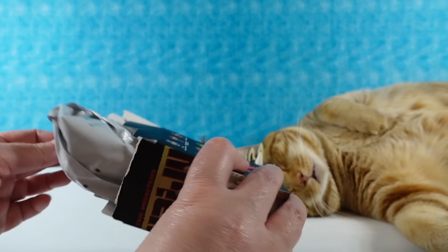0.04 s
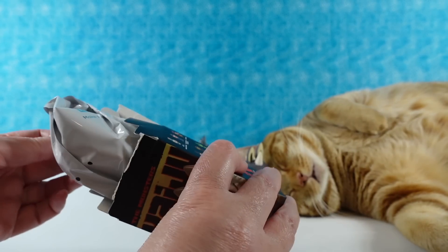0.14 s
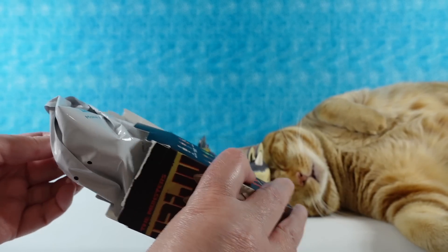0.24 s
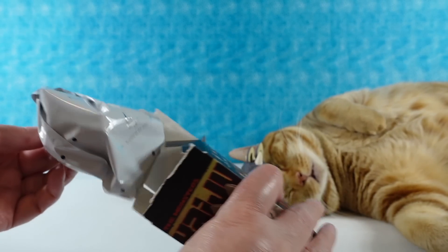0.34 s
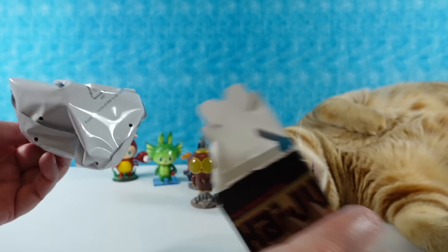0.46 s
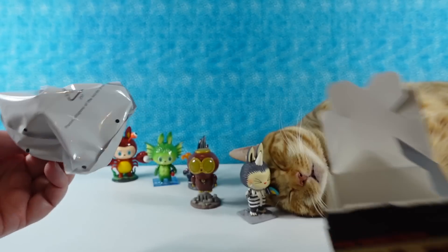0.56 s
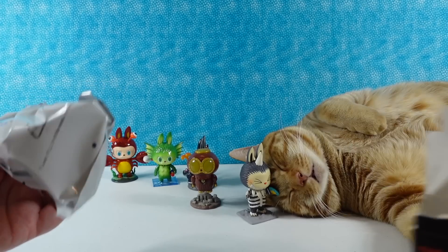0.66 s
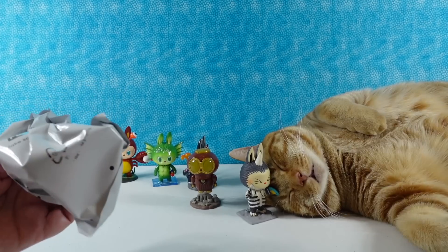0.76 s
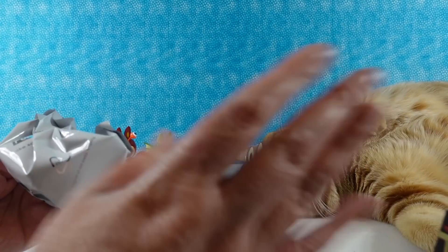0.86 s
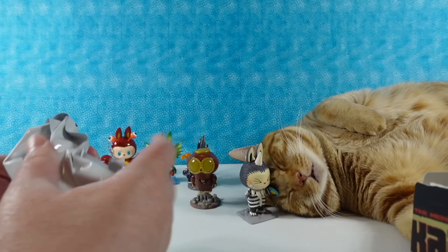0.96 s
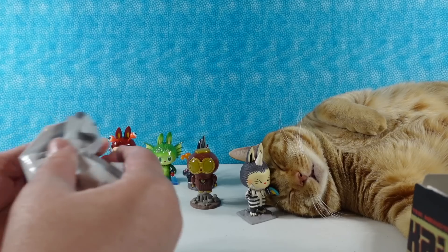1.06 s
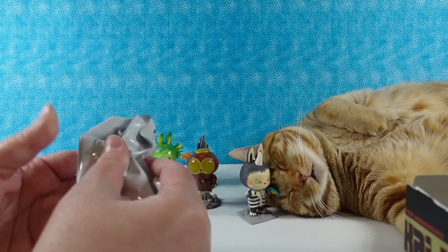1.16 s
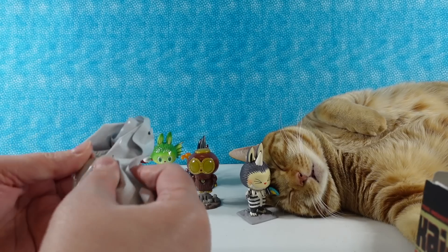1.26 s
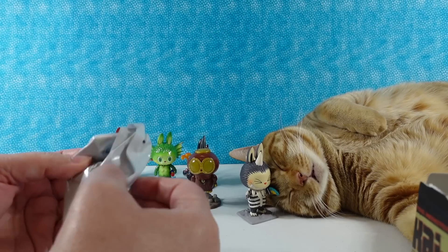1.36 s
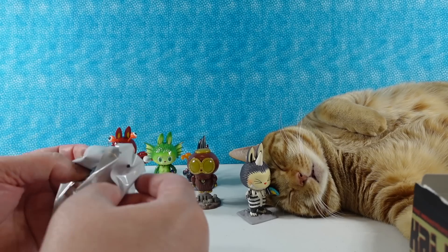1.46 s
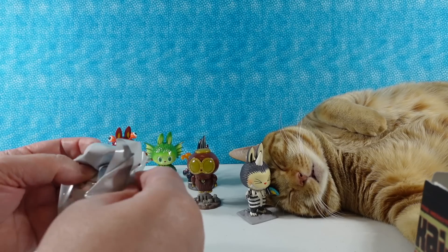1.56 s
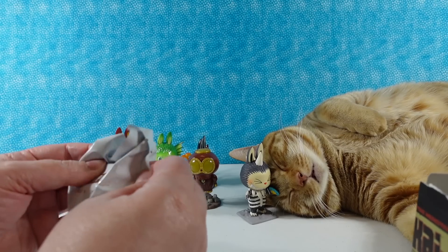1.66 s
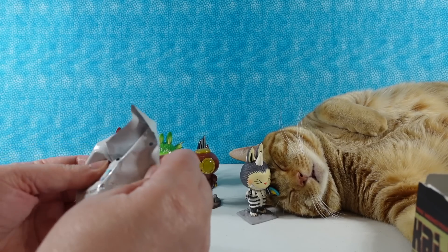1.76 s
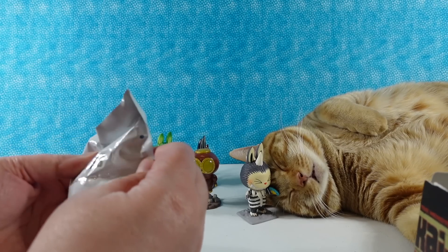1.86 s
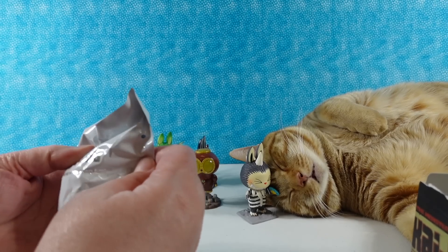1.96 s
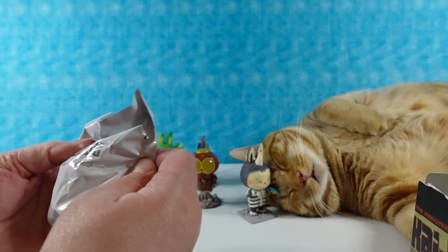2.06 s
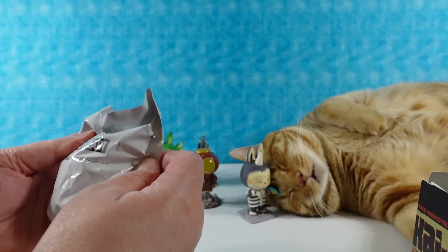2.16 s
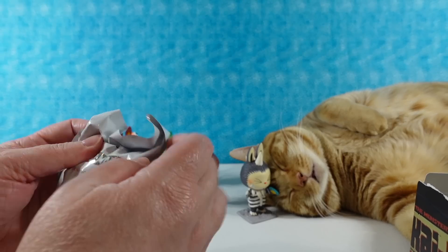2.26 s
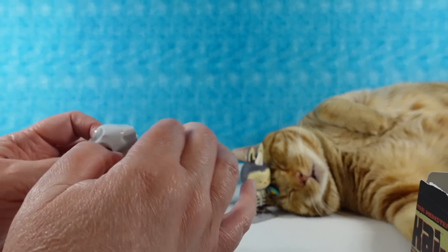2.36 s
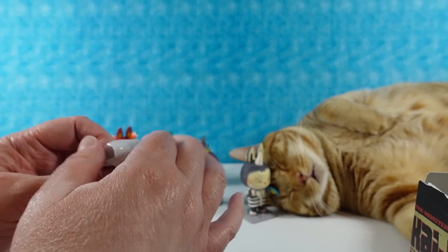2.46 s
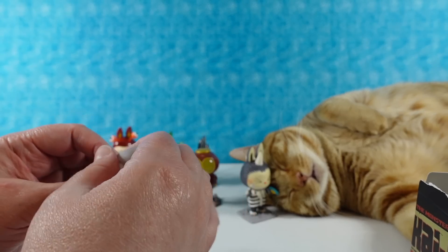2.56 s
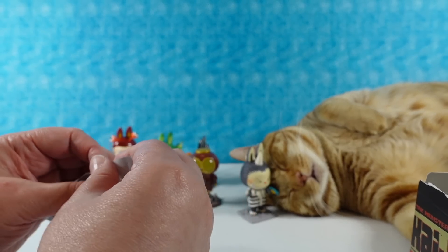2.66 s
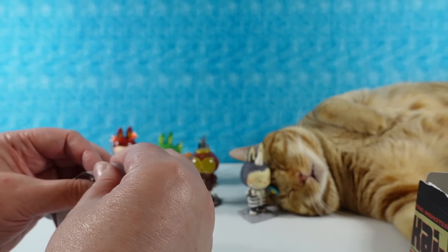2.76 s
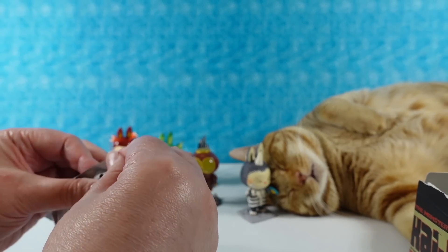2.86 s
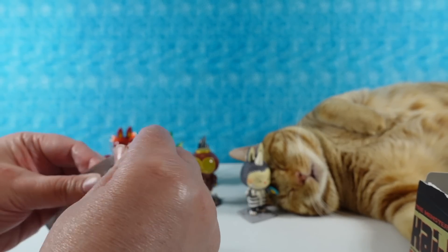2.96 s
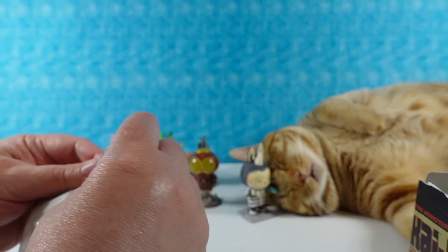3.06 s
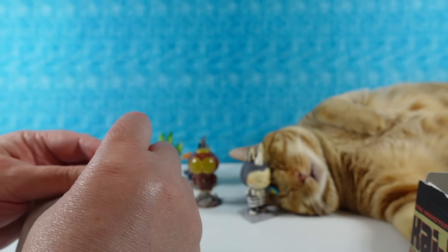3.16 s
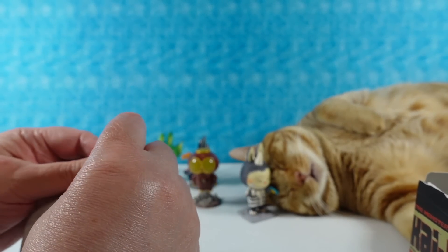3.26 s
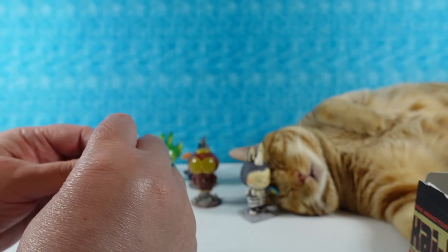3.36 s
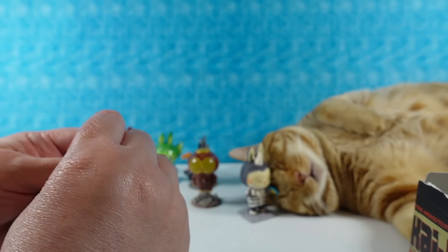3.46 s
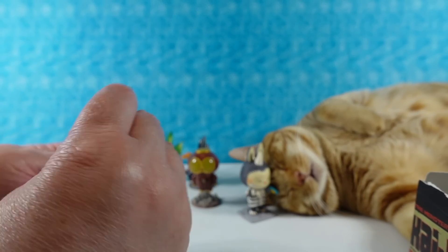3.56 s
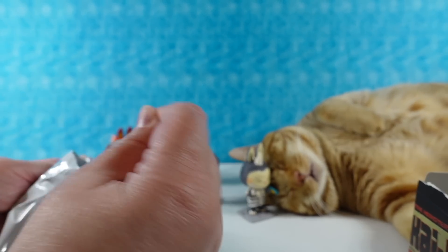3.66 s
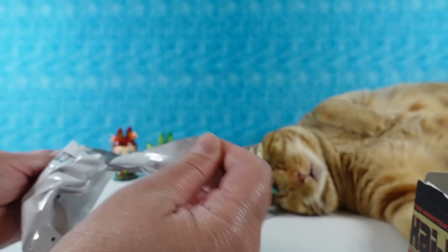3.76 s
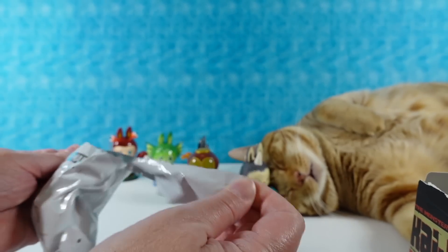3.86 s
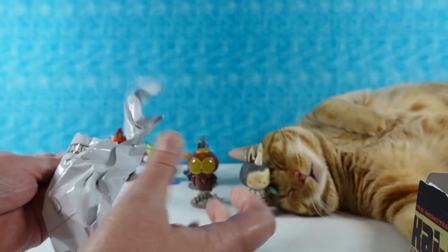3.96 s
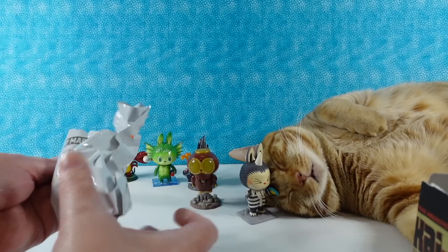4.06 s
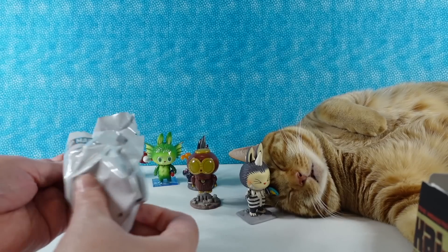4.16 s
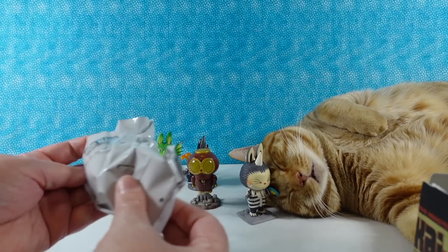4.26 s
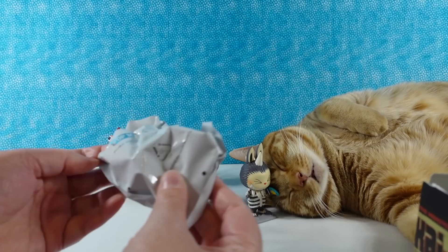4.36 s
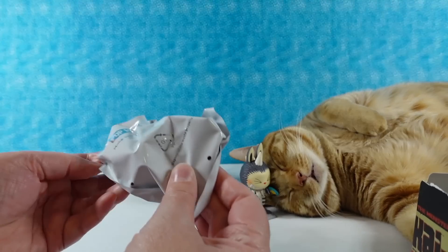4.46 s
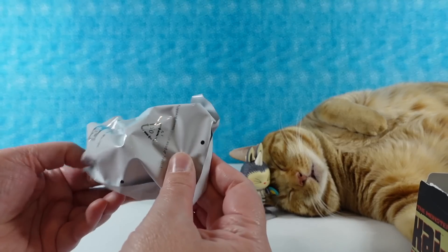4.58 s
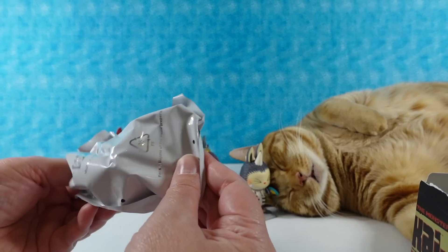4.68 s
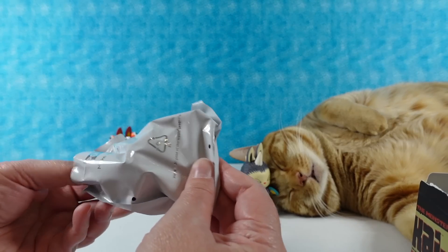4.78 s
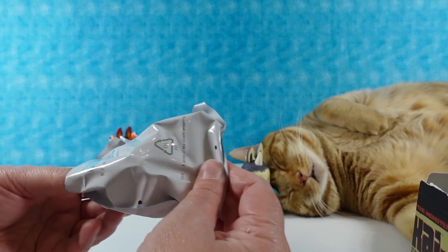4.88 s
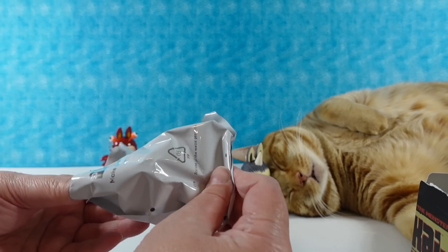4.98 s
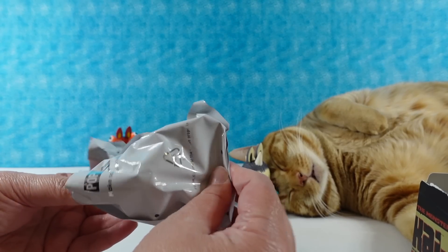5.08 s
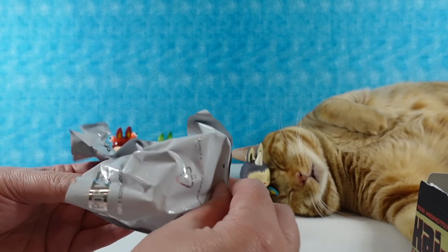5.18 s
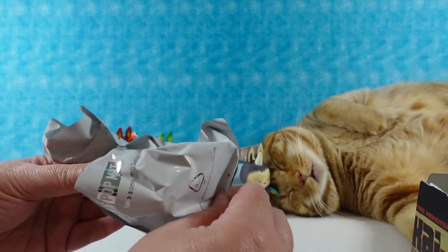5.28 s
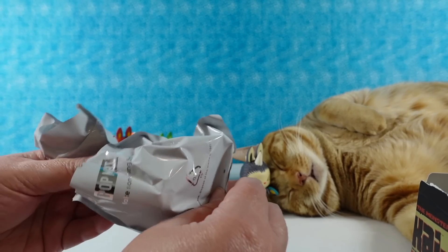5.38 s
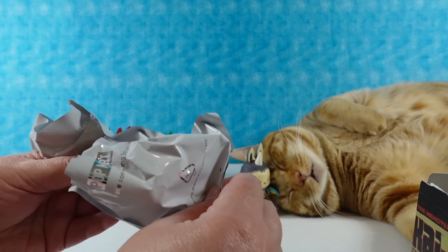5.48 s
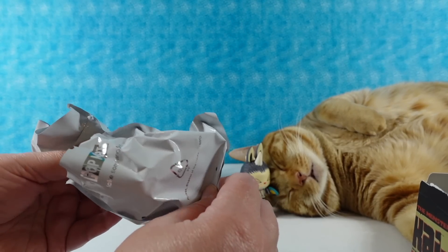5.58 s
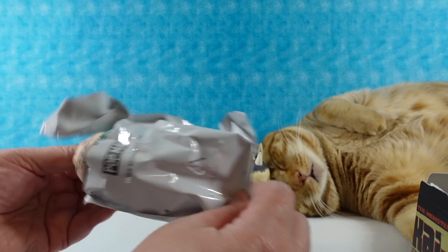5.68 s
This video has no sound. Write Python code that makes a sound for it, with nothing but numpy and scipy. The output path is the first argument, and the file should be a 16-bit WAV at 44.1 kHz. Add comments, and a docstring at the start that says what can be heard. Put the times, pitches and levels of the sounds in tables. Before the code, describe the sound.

Foil bag slides from a cardboard box with muffled crinkling, the box knocks the table, then dense, sharp, close foil crackling continues.

```python
"""Close at the microphone, hands slide a foil bag out of a cardboard box; its crinkling is coloured by the box's cavity.
From 0.52 s the bag is in free air; from 0.67 s the box knocks on the table, ringing it with a slap and a thud.
The bag is crumpled open, and from 3.92 s its gaping mouth colours the crinkling; four times a side flips with a deep pop.
Throughout, each large crease rings a facet of film and pops the hollow bag, over fine crackle and rubbing noise.
A small dry room answers with decaying noise, over faint still air."""
import sys
import numpy as np
from scipy import signal
from scipy.fft import rfft, irfft, next_fast_len
from scipy.io import wavfile
from scipy.ndimage import uniform_filter1d

SR = 44100
rng = np.random.default_rng(int(sys.argv[2]) if len(sys.argv) > 2 else 0)


def store_wav(level_fs):
    """Save 16-bit WAV to argv[1]."""
    pcm = np.round(np.clip(np.atleast_2d(level_fs), -1, 1) * 32767)
    wavfile.write(sys.argv[1], SR, pcm.T.astype(np.int16))


N = 252648  # samples in the whole take

# All level_db columns are relative: each source sets its own gain on top.
# each squeeze, push or pull of the fingers: start_s [s], hold_s [s], crackle_db [dB], bag_flex_db [dB]
SQUEEZES = [(0.0, 0.079, -25.5, -30.5), (0.18, 0.076, -44.5, -49.5), (0.27, 0.068, -33.5, -42),
            (0.456, 0.0039, -37, -45), (0.634, 0.013, -34.5, -48.5), (0.709, 0.17, -39.5, -51),
            (0.921, 0.089, -41, -42), (1.029, 0.151, -29.5, -38.5), (1.264, 0.071, -27, -46),
            (1.403, 0.15, -22.5, -37.5), (1.652, 0.11, -23.5, -31.5), (1.814, 0.1, -27, -31.5),
            (1.989, 0.089, -26.5, -40.5), (2.236, 0.1, -20, -32), (2.417, 0.1, -32.5, -61),
            (2.548, 0.053, -29.5, -53), (2.708, 0.22, -28.5, -42), (2.972, 0.02, -28.5, -38.5),
            (3.041, 0.13, -23, -32), (3.27, 0.075, -46.5, -45.5), (3.389, 0.062, -32.5, -43.5),
            (3.462, 0.028, -29.5, -31.5), (3.568, 0.14, -18.5, -26), (3.72, 0.086, -27.5, -38.5),
            (3.922, 0.031, -26.5, -36.5), (4.055, 0.018, -31.5, -62), (4.193, 0.069, -28.5, -42.5),
            (4.325, 0.068, -31, -41), (4.448, 0.028, -34, -38.5), (4.516, 0.044, -33.5, -35.5),
            (4.625, 0.05, -25, -37), (4.772, 0.17, -33, -35), (5.005, 0.13, -30.5, -39.5),
            (5.202, 0.086, -23.5, -44), (5.275, 0.16, -25.5, -29.5), (5.502, 0.027, -33, -40.5),
            (5.635, 0.019, -33, -38.5), (5.703, 0.055, -18.5, -41)]
# large creases that buckle: start_s [s], snap_db [dB], facet_ring_hz [Hz], bag_pop_db [dB]
CREASES = [(0.0368, -16, 3317, -23), (0.0856, -10, 2447, -24.5), (0.1166, -11, 7290, -34),
           (0.3186, -13.5, 3760, -26), (0.3511, -16, 3206, -19.5), (0.3552, -9, 3770, -15.5),
           (0.4156, -26, 2882, -24.5), (0.4575, -18, 4050, -42), (0.5839, -17.5, 4304, -43),
           (0.706, -15.5, 3217, -34), (0.8188, -40, 3060, -24), (1.0359, -11.5, 5050, -23.5),
           (1.0924, -7, 6953, -27), (1.1682, -10, 5117, -46), (1.1816, -11, 7210, -30),
           (1.2525, -7, 5666, -24), (1.2771, -18, 4400, -16.5), (1.3104, -6.5, 3395, -12),
           (1.3366, -9, 3856, -38), (1.3841, -8.5, 5456, -31), (1.3965, -13, 4246, -26),
           (1.422, -6, 5010, -12), (1.4415, -11, 4970, -14), (1.477, -5.5, 3846, -17),
           (1.5173, -8.5, 5107, -17), (1.564, -12.5, 4270, -30), (1.5738, -13, 5315, -25),
           (1.604, -19, 3410, -21.5), (1.6385, -7.5, 4530, -44), (1.6622, -6, 4565, -38),
           (1.699, -10.0, 5510, -32), (1.7636, -10.5, 6240, -19), (1.8075, -17, 3790, -10.5),
           (1.8177, -12, 3180, -9), (1.8259, -14, 3887, -8.5), (1.8595, -7, 5287, -17),
           (1.8772, -13.5, 3668, -13), (1.8998, -8.5, 4064, -21), (1.9623, -7, 5060, -17),
           (1.9964, -10, 3700, -21), (2.049, -7, 3395, -20), (2.1088, -9, 5107, -45),
           (2.115, -12.5, 6596, -49), (2.1262, -13, 4940, -39), (2.134, -8, 4190, -42),
           (2.1502, -10.5, 5075, -29), (2.1936, -7, 4316, -29), (2.2404, -9, 4200, -17),
           (2.2624, -10, 5160, -16), (2.2706, -8, 5230, -10.5), (2.2884, -7, 5155, -36),
           (2.2967, -6, 4837, -22), (2.4361, -13.5, 3632, -30.5), (2.58, -27, 5000, -21.5),
           (2.594, -16.5, 6940, -37), (2.6634, -10.5, 5580, -29), (2.7287, -10.5, 6050, -34),
           (2.751, -9, 6840, -32), (2.8075, -11, 5990, -22.5), (2.855, -7, 6570, -22),
           (2.9116, -10.5, 7376, -38), (2.9414, -10, 3220, -18), (3.0044, -12, 7363, -40),
           (3.039, -10, 4615, -35), (3.09, -27, 4717, -21), (3.1016, -14, 7304, -33),
           (3.1523, -11, 5986, -15.5), (3.277, -21, 6404, -42), (3.3053, -14.5, 6093, -29.5),
           (3.4445, -10, 6530, -26), (3.4841, -6, 3556, -18), (3.4972, -12, 4980, -14.5),
           (3.5489, -7.5, 5790, -33), (3.5702, -7.5, 7100, -16), (3.6115, -5.5, 5500, -24),
           (3.629, -13, 5470, -19), (3.6856, -13, 5050, -13), (3.7425, -11, 6580, -53),
           (3.7601, -7, 7090, -18), (3.8408, -9, 5700, -17), (3.9003, -10.5, 4390, -33),
           (3.9291, -13, 5045, -34), (3.9381, -6.5, 4390, -35), (3.9741, -9.5, 4780, -23.5),
           (4.0505, -8.5, 4195, -26.5), (4.0658, -11.5, 4820, -35), (4.1786, -21, 2794, -29),
           (4.1958, -10, 5700, -29), (4.2262, -9.5, 5160, -40), (4.289, -13, 3550, -26.5),
           (4.3234, -8.5, 5745, -21.5), (4.3369, -10.5, 3640, -28), (4.3766, -10.5, 3955, -23.5),
           (4.4203, -16.5, 2287, -21), (4.5217, -17.5, 3720, -25), (4.573, -11.5, 4460, -44),
           (4.6259, -15.5, 3290, -21), (4.6664, -6, 4990, -16), (4.746, -8.5, 4786, -26),
           (4.8135, -9.5, 3650, -42), (4.842, -15.5, 2500, -18), (4.8605, -9.5, 4475, -13.5),
           (4.898, -7, 7845, -54), (5.0155, -11, 2316, -11), (5.0777, -9, 5870, -23),
           (5.0963, -7, 4530, -27), (5.125, -14.5, 3113, -30), (5.1916, -10.5, 6294, -30),
           (5.2017, -7.5, 3920, -43), (5.268, -9, 5900, -29), (5.2902, -10, 3317, -14.5),
           (5.325, -8.5, 4165, -17), (5.39, -11.5, 2270, -20), (5.4273, -8, 4154, -17),
           (5.6798, -8, 2934, -31), (5.6991, -9, 4220, -17.5), (5.7107, -7.5, 4270, -14)]
# a buckling facet of film: multiple_of_ring [ratio], level_db [dB]
FACET = [(.04, -56), (.12, -25), (.25, -11), (.5, -2.5), (.8, -1.5), (1.1, -1), (1.6, -6), (2.4, -12.5),
         (4, -19), (8, -41)]
# the hollow bag: pitch_hz [Hz], level_db [dB]
BAG = [(60, -46.5), (130, -29.5), (250, -18), (450, -12.5), (680, 2.5), (1000, 3.5), (1300, -1.5),
       (1900, -2.5), (4000, -64)]
# fingers and cardboard rubbing on film: pitch_hz [Hz], level_db [dB]
RUB = [(500, -34), (1200, -6.5), (2100, 10), (3500, 3), (6000, 5.5), (10000, -0.5), (16000, -10)]
# the box's cavity around the bag: pitch_hz [Hz], level_db [dB]
IN_BOX = [(150, 16), (370, 14), (500, 6.5), (650, 1.5), (900, 4.5), (1150, -2.5), (1500, 2.5), (2000, 1.5),
          (4000, 1), (16000, 1)]
# the bag's own cavity once it gapes: pitch_hz [Hz], level_db [dB]
GAPING = [(150, 6), (300, 5), (520, 2), (750, -5), (1300, -1.5), (1700, -2), (2150, 6), (2500, -4),
          (3300, 2.5), (4500, -2.5), (9000, 0.5)]
# the room's decay: pitch_hz [Hz], t60_s [s]
ROOM = [(150, 0.34), (800, 0.16), (3000, 0.19), (8000, 0.22), (16000, 0.22)]
# still room air: pitch_hz [Hz], level_db [dB]
AIR = [(20, -4), (50, -28), (110, 1.5), (200, 9), (400, 5), (1500, 2.5), (6000, -29), (16000, -29)]
# the box meets the table and is nudged: start_s [s], level_db [dB], contact_s [s]
KNOCKS = [(0.667, -20.5, 0.0014), (0.731, -8.5, 0.00038), (0.967, -31, .002), (1.016, -24, 0.017),
          (1.105, -16.5, 0.0045)]
# resonances of the box on the table: pitch_hz [Hz], level_db [dB], t60_s [s]
BOX = [(110.6, -14, 0.26), (141, -9.5, 0.17), (167, -5.5, 0.18), (228, -13, 0.083), (299, -3, 0.14),
       (369, 3, 0.069), (463, -13, 0.064), (560, -26, 0.069), (664, -9, .07), (908, -7, 0.087),
       (1020, 5, 0.027)]
# a whole side of the bag flips: start_s [s], level_db [dB], settled_pitch_hz [Hz]
FLIPS = [(1.603, -28, 330), (1.996, -22.5, 262), (4.769, -23.5, 492), (4.883, -23, 340)]

TOP_HZ = 16000  # upper band limit
SNAP_SIZE = 1024  # samples in one click
LEAVES_BOX_S, OPENS_S = 0.52, 3.92  # the bag comes out of the box, then gapes
GRIP_DB_PER_S, RELAX_DB_PER_S = 762, 288  # the fingers take hold quickly, the film relaxes more slowly
RESTING_DB = -56  # the bag merely held
SETTLE_DB, SETTLE_DB_PER_S = -25, 213  # small creases settle in the wake of each snap
GAPE_SWING, GAPE_CHANGES_PER_S = 0.095, 20  # how far (share of pitch) and how often the open bag is reshaped


def amp(db):
    """Decibels to gain."""
    return 10 ** (np.asarray(db) / 20)


def unit(x):
    """Scale to rms 1."""
    return x / np.sqrt(np.mean(x ** 2) + 1e-20)


def along(points, hz):
    """Read (Hz, value) points on a logarithmic frequency axis."""
    point_hz, value = np.transpose(points)
    return np.interp(np.log(hz + 1e-6), np.log(point_hz), value)


def filtered(x, response):
    """Apply a response given as a function of frequency."""
    size = 2 * next_fast_len(N // 2 + SR // 4)
    spectrum = rfft(x, size) * response(np.fft.rfftfreq(size, 1 / SR))
    return irfft(spectrum, size)[..., :N]


def noise(spectrum):
    """Coloured noise of rms 1."""
    return unit(filtered(rng.standard_normal(N), lambda hz: amp(along(spectrum, hz))))


def add(track, start_s, sound):
    """Mix a sound into a track at its start time."""
    start = int(np.clip(round(start_s * SR), 0, N - 1))
    track[start:start + len(sound)] += sound[:N - start]


def causal(gain_db):
    """Minimum-phase response of a body with these gains: it rings only after it is struck."""
    cepstrum = irfft(np.log(amp(gain_db)))
    size = cepstrum.shape[-1]
    cepstrum[..., 0] /= 2
    return np.exp(rfft(2 * cepstrum[..., :size // 2], size))


def handling(squeeze_db, snap_db):
    """Small-crease level in dB: each squeeze rises, holds and relaxes, and each snap leaves the film settling."""
    t = np.arange(N) / SR
    coarse = t[::64]
    start, hold = np.transpose(SQUEEZES)[:2, :, None]
    before_s = np.maximum(start - coarse, 0)
    after_s = np.maximum(coarse - start - hold, 0)
    fade_db = GRIP_DB_PER_S * before_s + RELAX_DB_PER_S * after_s
    squeezing = amp(squeeze_db[:, None] - fade_db)
    age = coarse - np.array(CREASES)[:, :1]
    settling = (age > 0) * amp(snap_db[:, None] + SETTLE_DB - SETTLE_DB_PER_S * np.abs(age))
    power = np.sum(squeezing ** 2, axis=0) + np.sum(settling ** 2, axis=0) + amp(RESTING_DB) ** 2
    return np.interp(t, coarse, 10 * np.log10(power))


def buckles(shape, scale, jump_s, flutter_db, flutter_s, modes_db, knot_count=40):
    """One click per scale, of rms 1 over 1 ms: a sudden jump and brief flutter, rung through random modes."""
    t = np.arange(SNAP_SIZE) / SR
    hz = np.fft.rfftfreq(2 * SNAP_SIZE, 1 / SR)
    # every crumpled facet has another outline, so its peaks and dips fall at random
    knots = np.geomspace(300, TOP_HZ, knot_count)
    random_rows = rng.standard_normal((len(scale), knot_count))
    modes = np.array([np.interp(hz, knots, row) for row in random_rows])
    colour = causal(along(shape, hz / scale[:, None]) + modes_db * modes)
    # the fold runs across the facet: its push swells, then dies, faster for some creases than for others
    run = t / (jump_s * np.exp(0.64 * rng.standard_normal((len(scale), 1))))
    jump = run * np.exp(1 - run)
    flutter = amp(flutter_db) * np.exp(-t / flutter_s)
    push = rng.standard_normal((len(scale), SNAP_SIZE)) * (jump + flutter)
    clicks = irfft(rfft(push, 2 * SNAP_SIZE) * colour)
    return clicks / np.linalg.norm(clicks, axis=1, keepdims=True) * np.sqrt(SR / 10 ** 3)


def crackle(fine_db, flex_db, rub_db, brush_db, slide_db, rate, size_db, ring_hz, spread, pop_spread,
            largest_db, count=64):
    """Small creases give way at random, more of them under a harder grip, over the hiss of rubbing."""
    _, _, squeeze_db, squeeze_flex_db = np.transpose(SQUEEZES)
    snap_s, snap_db, snap_hz, snap_pop_db = np.transpose(CREASES)
    grip_db = handling(squeeze_db, snap_db)
    bend_db = handling(squeeze_flex_db, snap_pop_db)

    hit = rng.random(N) < rate / SR * amp((grip_db - grip_db.mean()) / 2)
    sizes = hit * amp(size_db * np.minimum(rng.exponential(size=N), 3))
    # the hands feed in energy evenly, so a big crease leaves less for its neighbours
    nearby_power = np.abs(uniform_filter1d(sizes ** 2, size=1100)) * SR / 10 ** 3
    sizes /= np.sqrt(nearby_power + 0.043)
    sizes = np.minimum(sizes, amp(largest_db - grip_db))

    # small creases ring like the large ones that buckle around the same time
    t = np.arange(N) / SR
    nearby_hz = np.interp(t, snap_s, uniform_filter1d(snap_hz, size=5))
    pitch = np.log(nearby_hz / snap_hz.mean()) + spread * rng.standard_normal(N)
    scales = np.linspace(-1, 1, count)
    facet_of = np.minimum(np.searchsorted(scales, pitch), count - 1)
    facets = buckles(FACET, ring_hz * np.exp(scales), jump_s=0.00019, flutter_db=-12.5,
                     flutter_s=0.0024, modes_db=5)
    pops = buckles(BAG, np.exp(pop_spread * rng.standard_normal(count)), jump_s=0.00051, flutter_db=-9,
                   flutter_s=0.0018, modes_db=6)

    # while the bag slides out of the box it rubs more and creases less
    sliding_db = slide_db * (t < LEAVES_BOX_S)
    sizes *= amp(-sliding_db)
    rubbing = amp(grip_db + rub_db + sliding_db) * noise(RUB)
    brushing = amp(bend_db + brush_db) * noise(BAG)
    track = rubbing + brushing
    for i in np.flatnonzero(hit):
        facet = amp(grip_db[i] + fine_db) * facets[facet_of[i]]
        pop = amp(bend_db[i] + flex_db) * pops[facet_of[i]]
        add(track, i / SR, sizes[i] * (facet + pop))
    return track


def snaps(snap_db, pop_db):
    """Large creases buckle: each rings its own facet and shakes the hollow bag."""
    start_s, level_db, ring_hz, bag_db = np.transpose(CREASES)
    facets = buckles(FACET, ring_hz, jump_s=0.00022, flutter_db=-5.5, flutter_s=0.0024, modes_db=2.5)
    pops = buckles(BAG, np.ones(len(start_s)), jump_s=0.00022, flutter_db=-8, flutter_s=0.0013, modes_db=3.5)
    sounds = amp(level_db + snap_db)[:, None] * facets + amp(bag_db + pop_db)[:, None] * pops
    track = np.zeros(N)
    for start, sound in zip(start_s, sounds):
        add(track, start, sound)
    return track


def cavities(bag):
    """Resonances colour the crinkling: first the box, then free air, then the changing mouth of the open bag."""
    t = np.arange(N) / SR

    def through(x, cavity, scale=1):
        """Pass a sound through a cavity whose pitches are scaled."""
        return filtered(x, lambda hz: causal(along(cavity, hz / scale)))

    boxed, opened = t < LEAVES_BOX_S, t > OPENS_S
    gape = np.interp(t * GAPE_CHANGES_PER_S, np.arange(SR), rng.uniform(-1.1, 1, SR))
    # crossfade between a low, a middle and a high tuning of the mouth
    mouth = np.zeros(N)
    for k in (-1, 0, 1):
        share = np.maximum(1 - np.abs(gape - k), 0)
        mouth += through(bag * opened * share, GAPING, 1 + GAPE_SWING * k)
    return through(bag * boxed, IN_BOX) + bag * ~(boxed | opened) + mouth


def room(x, wet_db, width_db, onset_s, count=6):
    """The walls' answer as decaying noise, slightly unlike at the two ports; it changes as the hands move."""
    answer = np.zeros((2, N))
    for place in range(count):
        hz, t, z = signal.stft(rng.standard_normal((2, SR // 3)), SR, nperseg=256)
        decay = amp(-60 * t / along(ROOM, hz)[:, None])
        onset = 1 - np.exp(-(t / onset_s) ** 2)
        tail = signal.istft(z * decay * onset, SR, nperseg=256)[1]
        # the places take turns, a tenth of a second each
        here = np.arange(N) * 10 // SR % count == place
        answer += signal.fftconvolve((x * here)[None], tail / np.linalg.norm(tail[0]), axes=1)[:, :N]
    mid, side = amp(wet_db) * answer[0], amp(wet_db + width_db) * answer[1]
    return np.array([mid + side, mid - side])


def still_air(mid_db, apart_db):
    """Steady coloured noise: one part common to both ports, one independent in each."""
    return amp(mid_db) * noise(AIR) + amp(apart_db) * np.array([noise(AIR), noise(AIR)])


def box(ring_db, slap_db, slap_s, thud_db, thud_hz, thud_s):
    """Each knock rings box and table, with a slap of cardboard on top and a dull thud as the flaps settle."""
    track, t = np.zeros(N), np.arange(SR // 2) / SR

    def thud_band(hz):
        """A broad band around the thud's pitch."""
        return (hz / thud_hz) ** 2 / (1 + (hz / thud_hz) ** 4)

    for start_s, db, contact_s in KNOCKS:
        ring = np.zeros(len(t))
        for hz, level_db, t60 in BOX:
            decay = amp(level_db + rng.normal(0, 3.2) - 60 * t / t60)
            ring += decay * np.sin(2 * np.pi * (hz * t + rng.random()))
        slap = noise(RUB)[:len(t)] * np.exp(-t / slap_s)
        thud = unit(filtered(rng.standard_normal(N), thud_band))[:len(t)] * np.exp(-t / thud_s)
        blow = amp(ring_db) * ring + amp(slap_db) * slap + amp(thud_db) * thud
        # a longer contact makes a softer attack
        add(track, start_s, amp(db) * blow * (1 - np.exp(-t / contact_s)))
    return track


def flips(level_db, rise_s, sag, sag_s):
    """A side of the bag flips over and swings for a few cycles, its pitch sagging as the tension goes."""
    track, t = np.zeros(N), np.arange(SR // 10) / SR
    for start_s, db, hz in FLIPS:
        phase = 2 * np.pi * np.cumsum(hz * (1 + sag * np.exp(-t / sag_s))) / SR
        swell = t / rise_s * np.exp(1 - t / rise_s)
        add(track, start_s, amp(db + level_db) * np.sin(phase) * swell)
    return track


def ports(x, apart_db, apart_hz):
    """Two close microphone ports hear the bass alike and the treble a little differently."""
    def difference(hz):
        """A high-pass, delayed by 0.547 ms."""
        return 1j * hz / (apart_hz + 1j * hz) * np.exp(-2j * np.pi * hz * 0.000547)

    side = amp(apart_db) * filtered(x, difference)
    balance_db = [[.2], [-.2]]
    return np.array([x + side, x - side]) * amp(balance_db)


def scene():
    """Bag and box just in front of the microphone, in the room."""
    bag = crackle(
        fine_db=0.0, flex_db=-1.0, rub_db=-6, brush_db=-13, slide_db=3.5, rate=380, size_db=7.5,
        ring_hz=4400, spread=.3, pop_spread=0.12, largest_db=-15, count=160)
    bag = bag + snaps(snap_db=0.0, pop_db=0.5)
    near = cavities(bag)
    near = near + box(ring_db=-10.0, slap_db=-9, slap_s=0.0041, thud_db=-13.0, thud_hz=330, thud_s=0.022)
    near = near + flips(level_db=-5, rise_s=0.0019, sag=0.53, sag_s=.003)
    direct = ports(near, apart_db=-20, apart_hz=2500)
    answer = room(near, wet_db=-9.5, width_db=-26, onset_s=0.0067)
    return direct + answer + still_air(mid_db=-60.0, apart_db=-55.5)


def record(dry, ceiling=1.0, low_cut_hz=66):
    """The camera rounds off the tallest peaks, cuts the rumble and keeps nothing above its band limit."""
    rounded = dry / (1 + (dry / ceiling) ** 4) ** (1 / 4)

    def band(hz):
        """Third-order low cut and a sharp upper limit."""
        s = 1j * hz / low_cut_hz
        return s ** 3 / ((s + 1) * (s ** 2 + s + 1)) * (hz < TOP_HZ)

    return filtered(rounded, band)


dry = scene()
out = record(dry)
store_wav(out)
```